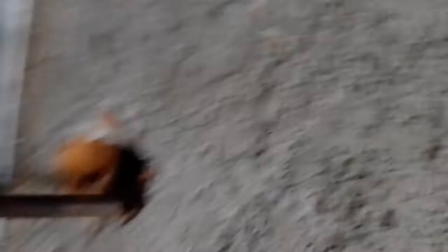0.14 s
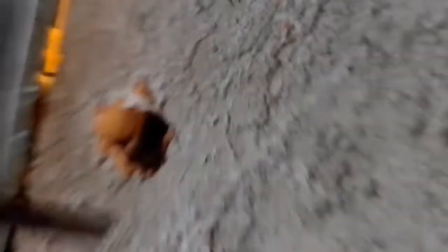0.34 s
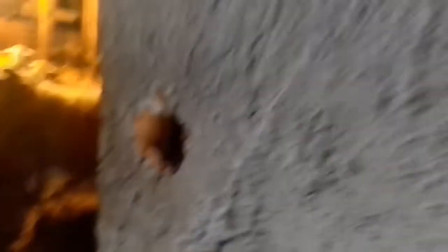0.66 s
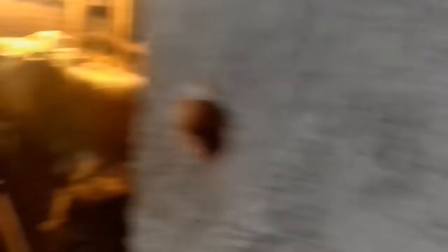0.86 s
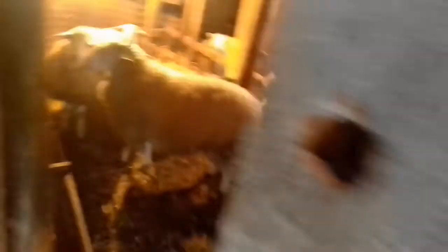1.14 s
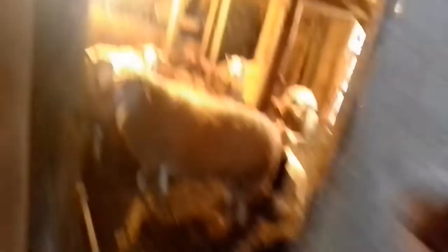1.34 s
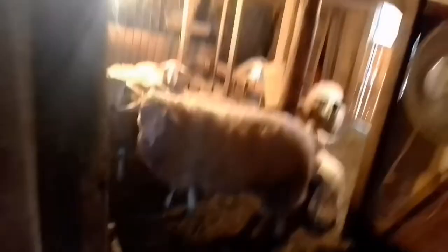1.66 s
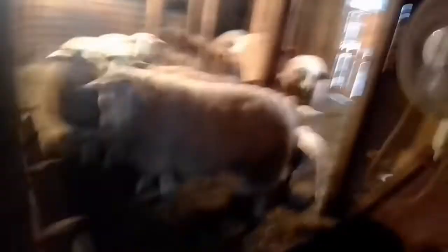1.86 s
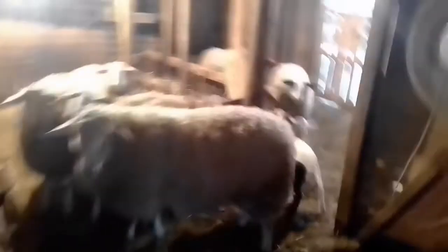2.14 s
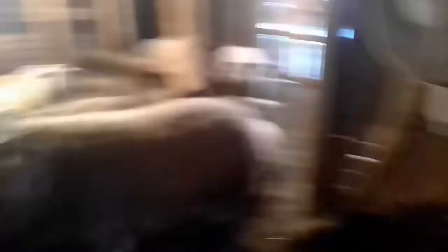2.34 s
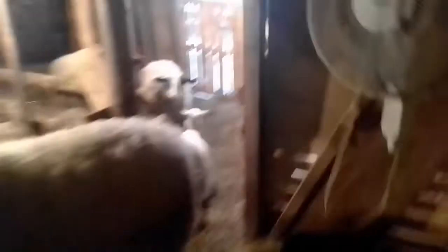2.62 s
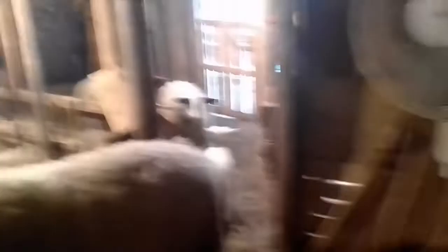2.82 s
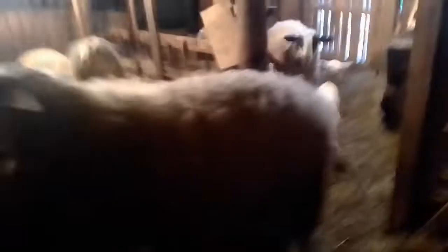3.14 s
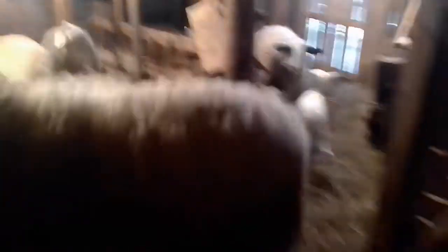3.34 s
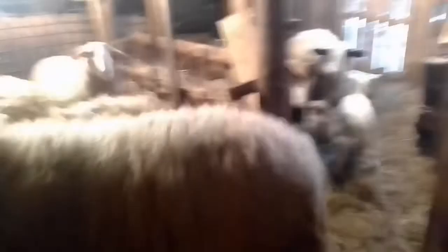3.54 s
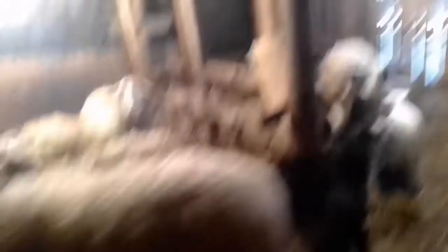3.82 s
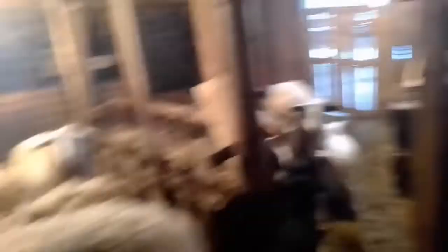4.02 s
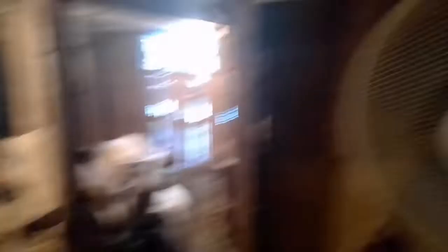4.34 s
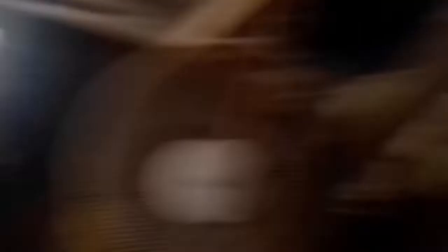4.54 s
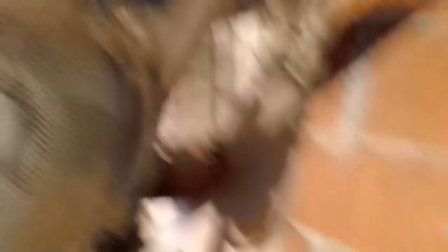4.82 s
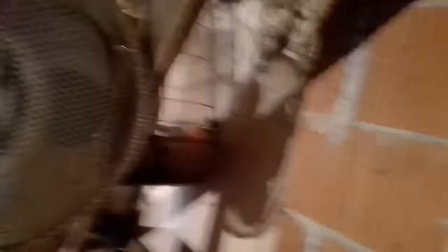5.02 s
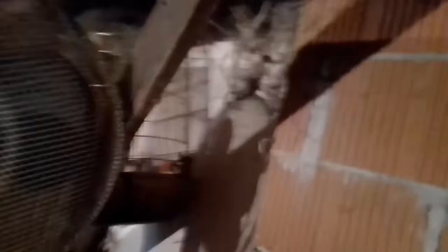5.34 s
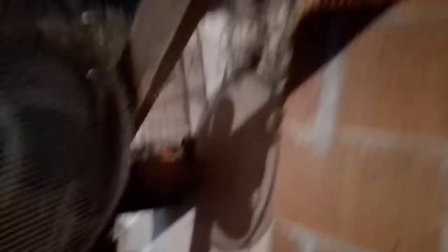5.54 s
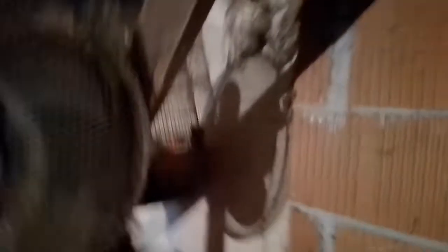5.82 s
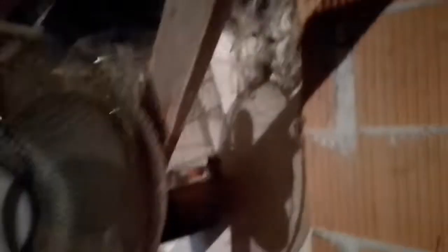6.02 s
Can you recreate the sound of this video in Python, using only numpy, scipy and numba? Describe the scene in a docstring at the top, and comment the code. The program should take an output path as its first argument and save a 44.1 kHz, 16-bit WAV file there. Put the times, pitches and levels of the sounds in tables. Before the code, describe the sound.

Sharp clanks and rattles from a barn door latch, followed by light knocks, rustling straw and a single sheep bleat.

```python
"""At a barn door, a steel bolt is drawn with a stick-slip scrape and squeal, slams against its stop and
rattles; the door bangs and swings on thin, squeaking hinges. Inside, hooves tap on boards, straw rustles
and an animal calls faintly. A sheep bleats once, its vocal folds ringing the resonances of throat and
mouth: the voice quavers, then steadies as the mouth closes. Clothing swishes near the microphone, and
hard walls give a short echo."""
import sys
import numpy as np
from scipy import signal
from scipy.fft import rfft, irfft
from scipy.io import wavfile
from scipy.ndimage import uniform_filter1d
from numba import njit

SR = 44100
rng = np.random.default_rng(int(sys.argv[2]) if len(sys.argv) > 2 else 0)


def store_pcm(level_fs):
    """Save levels as 16-bit WAV."""
    pcm = np.round(np.clip(level_fs, -1, 1) * 32767).astype(np.int16)
    wavfile.write(sys.argv[1], SR, np.atleast_2d(pcm).T)


N = 271876
T = np.arange(N) / SR

# swishes of clothing (time [s], half length [s], level [dB])
CLOTH_SWISHES = [(0.0, 0.3, -45), (1.62, 0.13, -49.5), (1.907, 0.05, -47), (2.068, 0.043, -50),
                 (2.3, 0.09, -50.5), (3.228, 0.12, -40.5), (3.964, 0.064, -31.5), (4.12, 0.078, -43.5),
                 (4.382, 0.23, -46.5), (4.937, 0.13, -46.5), (5.421, 0.12, -49.5), (5.811, 0.1, -48),
                 (6.13, 0.032, -48.5)]
# spectrum of rubbing cloth (frequency [Hz], gain [dB])
CLOTH_SPECTRUM = [(500, -27.5), (3000, -12), (6000, -10), (8000, -1), (10000, 1.5), (13000, -5),
                  (16000, -18.5)]
# feet shuffling in straw (time [s], half length [s], level [dB])
STRAW_SHUFFLES = [(0.33, .13, -42), (1.66, 0.043, -46.5), (1.97, .17, -46), (2.6, 0.13, -49),
                  (4.0, 0.14, -59.5), (5.03, 0.042, -47.5)]
# spectrum of the straw (frequency [Hz], gain [dB])
STRAW_SPECTRUM = [(120, -29.5), (300, -6), (700, -4), (1800, 4), (4000, -2), (9000, 5.5), (16000, -14.5)]
# spectrum of the still air (frequency [Hz], gain [dB])
AIR_SPECTRUM = [(25, -10), (50, -11), (100, -19), (165, -27), (260, -9), (380, -7), (1000, -11),
                (4000, -14), (9500, -11), (15000, -12)]
# spectrum of the sliding bolt (frequency [Hz], gain [dB])
SCRAPE_SPECTRUM = [(100, -31), (300, -29), (400, 1.5), (620, -5), (790, 0.5), (950, -6.5), (1230, 7),
                   (1600, -1.5), (2300, 1), (3200, -4), (6000, -4), (10000, -2), (13000, -14), (16000, -16)]
# squeals of bolt and hinges (start [s], length [s], pitch [Hz], waver [Hz], level [dB])
STEEL_SQUEALS = [(0.073, 0.051, 8140, 18, -15), (0.07, 0.056, 12112, 33, -24), (0.085, .08, 394, 11.6, -32),
                 (0.082, 0.086, 2075, 7.6, -10.5), (0.083, 0.1, 3764, 9, -19), (0.15, .05, 500.6, 6, -25),
                 (1.973, 0.18, 9990, 65, -37.5), (2.027, .07, 13000, 43, -43), (2.08, .09, 12740, 44, -27),
                 (2.5, 0.15, 9330, 69, -29), (2.501, 0.17, 9910, 264, -25.5), (2.511, .15, 6250, 97, -39.5),
                 (3.881, 0.19, 10500, 340, -31.5)]
# modes of the bolt (frequency [Hz], gain [dB], t60 [s])
BOLT_MODES = [(2075, -22.5, .1), (3764, -19, .15), (7440, 8, .05), (7576, -7, .05), (8640, 1, 0.15),
              (9940, -2, .06), (12030, -28.5, .2)]
# single knocks of bolt and latch (time [s], steel gain [dB], wood gain [dB])
LATCH_KNOCKS = [(0.077, -27, -34), (0.086, -38, -40), (0.209, -19.5, -21), (0.286, -17, -22.5),
                (0.453, -43, -26), (0.457, -13.5, -22.5), (0.474, -23.5, -22.5), (0.484, -21.5, -18),
                (0.622, -41.5, -36.5), (0.651, -26, -21.5), (0.821, -35.5, -32.5), (1.406, -30.5, -40.5),
                (1.555, -34, -31), (1.769, -31.5, -40), (1.782, -32.5, -40.5), (1.937, -24, -32),
                (2.463, -43, -55), (2.509, -30, -38.5), (3.209, -36, -55), (4.111, -40.5, -63),
                (5.011, -33, -36.5)]
# slams of bolt, then door (time [s], steel gain [dB], wood gain [dB], thud gain [dB], ring gain [dB],
# first gap [s], steel loss per rebound [dB])
HEAVY_SLAMS = [(0.234, -8.5, -23, -38, -10.5, .018, 5), (0.834, -9.5, -23.5, -54.5, -32, .013, 6.5)]
# hooves and flanks on boards (time [s], peak level [dB], tilt towards low modes [dB/octave])
BOARD_TAPS = [(1.048, -42.5, 12), (1.092, -45, 12), (1.166, -35, 3), (1.235, -28, -5), (1.553, -19.5, -19),
              (1.83, -39, 16.5), (2.046, -36, 6), (2.161, -39.5, 14), (2.241, -42, 17), (4.616, -42.5, 2)]
# modes of the boards (frequency [Hz], gain [dB], t60 [s])
BOARD_MODES = [(485, -29, 0.04), (988, -6.5, 0.033), (1386, -6, 0.034), (1663, 5.5, 0.015),
               (2600, 1.5, 0.024), (3030, 4, 0.018), (3190, 2.5, 0.02), (3790, -7, 0.018),
               (5100, -19, 0.0055)]
# calls from the far end (start [s], length [s], pitch [Hz], level [dB])
DISTANT_CALLS = [(2.677, 0.15, 291.5, -61), (4.14, 0.23, 270, -55.5)]
# formants of the far caller (frequency [Hz], width [Hz], gain [dB])
DISTANT_FORMANTS = [(1710, 310, 1), (2400, 690, -6), (3770, 280, 3)]
# course of the bleat (time [s], effort [dB], pitch [Hz], first formant [Hz], relative rasp [dB])
BLEAT_COURSE = [(3.25, -32, 172, 720, -9), (3.28, -20, 174.8, 730, -11.5), (3.341, -18.5, 167.3, 800, -11),
                (3.42, -14, 159.1, 840, -10), (3.499, -13, 164.9, 860, -5), (3.6, -14, 164.9, 735, -4),
                (3.76, -14.5, 167.2, 735, -4), (3.879, -17, 149.8, 725, -4), (3.924, -38, 142.7, 715, 14.5)]
# throbs that start the bleat (time [s], half length [s], strength [0-1])
BLEAT_THROBS = [(3.282, 0.0095, 0.46), (3.337, 0.0059, 0.99), (3.367, 0.0069, 1), (3.419, .015, .8),
                (3.48, .014, .55), (3.541, .017, .3)]
# formants of the sheep's throat (frequency [Hz], width [Hz], gain [dB])
THROAT_FORMANTS = [(1811, 345, 0.5), (3750, 150, -23)]
# high throat formants, heard as rasp (frequency [Hz], width [Hz], gain [dB])
RASP_FORMANTS = [(3640, 660, -1.5), (4540, 1100, -11.5), (5545, 1500, -1.5), (6620, 1100, -5),
                 (7500, 1300, -5.5), (8590, 710, -2), (9190, 1400, -4)]
# reverberation of the barn (frequency [Hz], t60 [s])
BARN_DECAY = [(250, 0.33), (700, 0.25), (1600, 0.17), (6000, 0.2), (15000, .22)]


def undb(db):
    """Decibels to amplitude ratio."""
    return 10 ** (np.asarray(db) / 20)


def unit(x):
    """Normalisation to rms 1."""
    return x / np.sqrt(np.mean(x ** 2) + 1e-18)


def walk(rate_hz, size=N):
    """Smooth random modulation with spread near 1."""
    hold = max(int(SR / rate_hz), 1)
    steps = np.repeat(rng.standard_normal(size // hold + 1), hold)
    return 1.2 * uniform_filter1d(steps, hold)[:size]


def swell(time_s, half_s):
    """Gaussian envelope, down to 1/e at half_s from its centre."""
    return np.exp(-((T - time_s) / half_s) ** 2)


def swells(rows):
    """Incoherent swells add in power."""
    return np.sqrt(sum(undb(db) ** 2 * swell(s, half_s) for s, half_s, db in rows))


def envelope(t, length_s, attack_s, release_s):
    """Trapezoidal envelope starting at t = 0."""
    return np.clip(np.minimum(t / attack_s, (length_s - t) / release_s), 0, 1)


def mode(t, hz, t60):
    """A damped free vibration falls 60 dB in t60 seconds."""
    return np.sin(2 * np.pi * hz * t) * np.exp(-np.log(1000) * t / t60)


def add(out, time_s, sound):
    """Superposition of a sound at a given time."""
    i = max(int(time_s * SR), 0)
    out[i:i + len(sound)] += sound[:N - i]


def grains(spread_db):
    """Granular noise: dense tiny clicks of unequal size."""
    sizes = np.repeat(rng.exponential(size=N // 16 + 1), 16)[:N]
    return unit(rng.standard_normal(N) * undb(spread_db * np.minimum(sizes, 5)))


def colour(x, spectrum, size=2048):
    """Minimum-phase filter of unit power, made by folding the cepstrum."""
    hz, db = np.transpose(spectrum)
    bins_hz = np.arange(size // 2 + 1) * SR / size
    gain = undb(np.interp(np.log(bins_hz + 1), np.log(hz), db))
    cepstrum = irfft(np.log(gain))
    cepstrum[1:size // 2] *= 2
    cepstrum[size // 2 + 1:] = 0
    response = irfft(np.exp(rfft(cepstrum)))
    return signal.fftconvolve(x, response / np.linalg.norm(response))[:len(x)]


def band(x, lo_hz, hi_hz, order=2):
    """Butterworth band-pass."""
    sos = signal.butter(order, [lo_hz, min(hi_hz, .45 * SR)], "band", fs=SR, output="sos")
    return signal.sosfilt(sos, x)


@njit
def svf(x, tuning, damping):
    """State-variable band-pass: a driven, damped oscillator with movable tuning."""
    y, mid, low = np.empty(len(x)), 0., 0.
    for i in range(len(x)):
        g, k = tuning[i], damping[i]
        v = (mid + g * (x[i] + 1e-18 - low)) / (1 + g * (g + k))
        mid, low, y[i] = 2 * v - mid, low + 2 * g * v, k * v
    return y


def resonance(x, hz, width_hz):
    """Two resonators in cascade, each width_hz wide, give a steep peak."""
    tuning, damping = np.tan(np.pi * hz / SR) * np.ones(N), width_hz / hz * np.ones(N)
    return svf(svf(x, tuning, damping), tuning, damping)


def rustle(straw_rest_db=-61.5):
    """Friction noise of cloth and straw; the flock never stands quite still."""
    cloth = colour(grains(spread_db=1), CLOTH_SPECTRUM) * swells(CLOTH_SWISHES) * undb(1.04 * walk(40))
    shuffling = np.hypot(swells(STRAW_SHUFFLES), undb(straw_rest_db))
    straw = colour(grains(spread_db=2.5), STRAW_SPECTRUM) * shuffling * undb(1.7 * walk(35))
    return band(cloth + straw, 230, .45 * SR, order=4)


def still_air(level_db=-56):
    """Stationary coloured noise forms the ambient floor."""
    return colour(rng.standard_normal(N), AIR_SPECTRUM) * undb(level_db)


def bolt_scrape(push_s=.08, push_db=-16.5, sag_db_per_s=25, rub_db=-45, catch_db=2.5):
    """Sliding friction: pushed hard once, the bolt catches and slips in its guide up to its stop."""
    t = T - push_s
    push = envelope(t, length_s=.115, attack_s=.011, release_s=.0046) * undb(push_db - sag_db_per_s * t)
    rub = undb(rub_db) * (T < HEAVY_SLAMS[0][0])
    grit = colour(grains(spread_db=3.3), SCRAPE_SPECTRUM)
    return grit * (push + rub) * undb(catch_db * walk(190))


def squeals(flutter_db=2.5):
    """Stick-slip oscillation: dry steel sings at a natural frequency, wavering with the pressure."""
    out, t = np.zeros(N), T[:SR // 4]
    for start, length_s, hz, waver_hz, db in STEEL_SQUEALS:
        grip = envelope(t, length_s, attack_s=.067 * length_s, release_s=.37 * length_s)
        waver = walk(350, len(t)) + walk(25, len(t)) / 2
        tone = np.sin(2 * np.pi * np.cumsum(hz + waver_hz * waver) / SR)
        add(out, start, tone * grip * undb(db + flutter_db * walk(220, len(t))))
    return out


def blow(steel_db, wood_db, thud_db, ring_db, crack_s=.002, rattle_s=.015, thud_s=.0006, body_s=.039):
    """Impact excitation: a crack and short chatter in the door, a thud, and the bolt's ringing modes."""
    t = T[:SR // 3]
    onset = 1 - np.exp(-t / .00055)
    fade = onset * (np.exp(-t / crack_s) + undb(-11) * np.exp(-t / rattle_s))
    noise = rng.standard_normal((3, len(t)))
    body = unit(band(noise[0], 470, 1700)) * np.exp(-t / body_s) * undb(-12)
    clack = unit(band(noise[1], 1279, 3800)) * fade * undb(1.5)
    snap = unit(band(noise[2], 6500, 13000, order=1)) * fade * undb(5)
    thud = band(np.exp(-t / thud_s), 30, 350) * undb(10.5)
    ring = sum(undb(db) * mode(t, hz, t60) for hz, db, t60 in BOLT_MODES)
    wood = undb(wood_db) * (body + clack)
    return wood + undb(steel_db) * snap + undb(thud_db) * thud + undb(ring_db) * ring


def light_blow(steel_db, wood_db):
    """A weak impact barely excites thud or ring."""
    return blow(steel_db, wood_db, thud_db=steel_db - 41, ring_db=steel_db - 24.5)


def knocks(rebounds=3, gap_growth=1.5):
    """Inelastic collisions: single knocks, and slams whose rebounds come later, weaker and duller."""
    out = np.zeros(N)
    for s, steel_db, wood_db, thud_db, ring_db, gap_s, loss_db in HEAVY_SLAMS:
        add(out, s, blow(steel_db, wood_db, thud_db, ring_db))
        for k in range(1, rebounds + 1):
            s, gap_s = s + gap_s, gap_s * gap_growth
            add(out, s, light_blow(steel_db - k * loss_db, wood_db))
    for s, steel_db, wood_db in LATCH_KNOCKS:
        add(out, s, light_blow(steel_db, wood_db))
    return out


def door_boom(start_hz=1030, end_hz=593, glide_s=.036, decay_s=.054, level_db=-32):
    """A hollow, damped resonance follows the slam and sinks in pitch as the door swings away."""
    t = np.maximum(T - HEAVY_SLAMS[-1][0], 0)
    hz = end_hz + (start_hz - end_hz) * np.exp(-t / glide_s)
    hollow = unit(resonance(rng.standard_normal(N), hz, width_hz=330))
    return hollow * undb(level_db) * np.exp(-t / decay_s) * (t > 0)


def board_taps(contact_s=.0092, scatter=.012):
    """Modal response: a gritty contact rings the boards; softer contacts favour the low modes."""
    out, t = np.zeros(N), T[:SR // 5]
    for s, peak_db, tilt in BOARD_TAPS:
        contact = rng.standard_normal(len(t)) * np.exp(-t / contact_s)
        detunings = 1 + scatter * rng.standard_normal(len(BOARD_MODES))
        ring = sum(undb(db - tilt * np.log2(hz / 2000)) * mode(t, hz * detune, t60)
                   for (hz, db, t60), detune in zip(BOARD_MODES, detunings))
        tap = band(signal.fftconvolve(contact, ring)[:len(t)], 300, 16000, order=3)
        add(out, s, tap * undb(peak_db) / np.abs(tap).max())
    return out


def distant_calls(jitter=.17):
    """Jitter: irregular glottal pulses make another animal's short calls hoarse."""
    out = np.zeros(N)
    for start, length_s, hz, level_db in DISTANT_CALLS:
        cycles = np.cumsum(hz * (1 + jitter * walk(100))) / SR
        closures = np.diff(np.floor(cycles), prepend=0)
        voice = unit(sum(undb(db) * resonance(closures, f, width) for f, width, db in DISTANT_FORMANTS))
        out += voice * undb(level_db) * np.sin(np.pi * np.clip((T - start) / length_s, 0, 1))
    return out


def quaver(tremor_hz=18.2, tremor_depth=.16):
    """Modulation of the voice about its mean: a few deep throbs over a slight, steady tremor."""
    throbs = sum(strength * swell(s, half_s) for s, half_s, strength in BLEAT_THROBS)
    tremor = tremor_depth * np.sin(2 * np.pi * tremor_hz * T)
    return 2 * (throbs - uniform_filter1d(throbs, size=2600)) + tremor


def vocal_folds(pitch_hz, shimmer_db=2.2):
    """Glottal source: one sharp closure and one hiss of air a cycle, uneven until the voice settles."""
    jitter = np.interp(T, [3.38, 3.5], [.09, .015])
    cycles = np.cumsum(pitch_hz * (1 + jitter * walk(170))) / SR
    shimmer = undb(shimmer_db * np.clip(walk(170), -2, 1))
    closures = unit(np.diff(np.floor(cycles), prepend=0) * shimmer)
    breath = unit(rng.standard_normal(N) * np.exp(-(cycles % 1) / .2954))
    return closures, breath


def bleat(quaver_pitch_share=.12, quaver_db=9, quaver_mouth_hz=130):
    """Source and filter: the vocal folds ring the formants of throat, mouth and nose."""
    times, *columns = np.transpose(BLEAT_COURSE)
    effort_db, pitch_hz, jaw_hz, rasp_db = (np.interp(T, times, column) for column in columns)
    start, end = times[0], times[-1]
    # each throb raises pitch and loudness and opens the mouth
    swing = quaver()
    pitch_hz = pitch_hz * (1 + quaver_pitch_share * swing)
    throb_db = quaver_db * swing
    # as the lips close, the mouth formant climbs and more sound takes the nose
    mouth_hz = np.interp(T, [start, end], [2040, 2584]) - quaver_mouth_hz * swing
    nose_db = np.interp(T, [start, end], [-8, -6])
    closures, breath = vocal_folds(pitch_hz)
    source, breathy_source = closures + undb(-16) * breath, closures + undb(-11) * breath
    # the larynx bobs with the pitch and moves the formants with it
    stretch = (pitch_hz / 165) ** .2 * (1 + .01 * walk(22))
    throat = sum(undb(db) * resonance(source, hz * stretch, width) for hz, width, db in THROAT_FORMANTS)
    mouth = undb(4) * resonance(source, mouth_hz, width_hz=352)
    nose = resonance(source, 2830 * stretch, width_hz=400)
    jaw = resonance(source, jaw_hz, width_hz=260)
    rasp = sum((-1) ** k * undb(db) * resonance(breathy_source, hz * stretch, width)
               for k, (hz, width, db) in enumerate(RASP_FORMANTS))
    voice = (unit(throat - mouth) * undb(throb_db)
             + unit(nose) * undb(nose_db)
             + unit(jaw) * undb(-19 + throb_db / 2)
             + unit(rasp) * undb(rasp_db + throb_db / 2))
    return band(voice * (T > start) * (T < end), 400, 16000) * undb(effort_db - 4)


def closing_note(time_s=3.892, centre_hz=735.6, sag_hz_per_s=700):
    """A falling pure tone through the nearly closed mouth ends the bleat."""
    hz = centre_hz - sag_hz_per_s * (T - time_s)
    return np.sin(2 * np.pi * np.cumsum(hz) / SR) * undb(-30.5) * swell(time_s, half_s=.021)


def barn_echo(x, build_s=.0057):
    """Reverberation: diffuse wall reflections decay exponentially, the lows most slowly."""
    t, tail = T[:SR * 3 // 4], 0
    edges_hz = np.geomspace(230, 19000, 11)
    hz, t60 = np.transpose(BARN_DECAY)
    for lo, hi in zip(edges_hz, edges_hz[1:]):
        band_t60 = np.interp(np.log(lo * hi) / 2, np.log(hz), t60)
        tail += band(rng.standard_normal(len(t)), lo, hi, order=4) * np.exp(-np.log(1000) * t / band_t60)
    tail *= np.clip(t / build_s, 0, 1)
    return signal.fftconvolve(x, tail / np.linalg.norm(tail))[:N]


def scene():
    """Direct and reverberant fields add: the door is at arm's length, the sheep a few metres inside."""
    door = knocks() + bolt_scrape() + door_boom()
    squeal = squeals()
    sheep = bleat() + closing_note()
    flock = board_taps() + distant_calls()
    direct = door + squeal + undb(-3) * sheep + flock
    echo = barn_echo(undb(-5.5) * door + undb(-4.5) * squeal + sheep + undb(-9.5) * flock)
    return (direct + echo + rustle() + still_air())[None]


def record(dry, top_hz=15700, dc_offset=-.0009):
    """Clipping and band limiting: the microphone limits peaks; the converter adds DC and cuts the top."""
    low_pass = signal.ellip(8, .1, 70, top_hz, fs=SR, output="sos")
    return signal.sosfiltfilt(low_pass, np.clip(dry, -1, 1) + dc_offset)


dry = scene()
out = record(dry)
store_pcm(out)
```